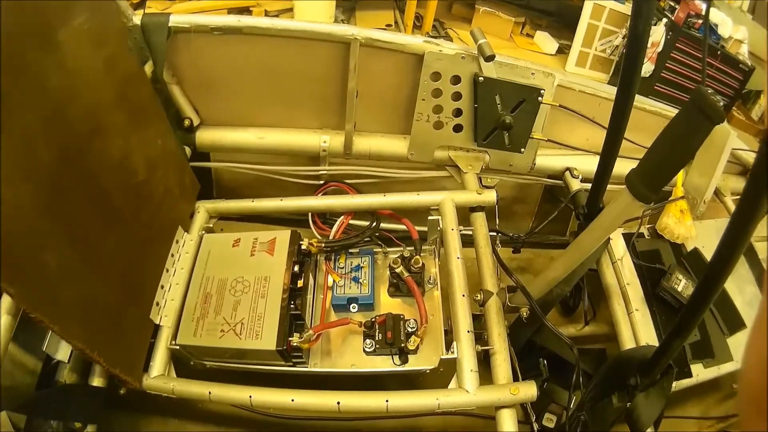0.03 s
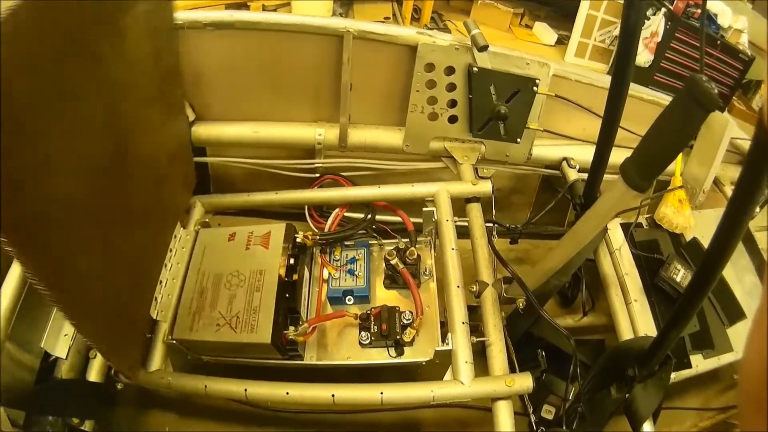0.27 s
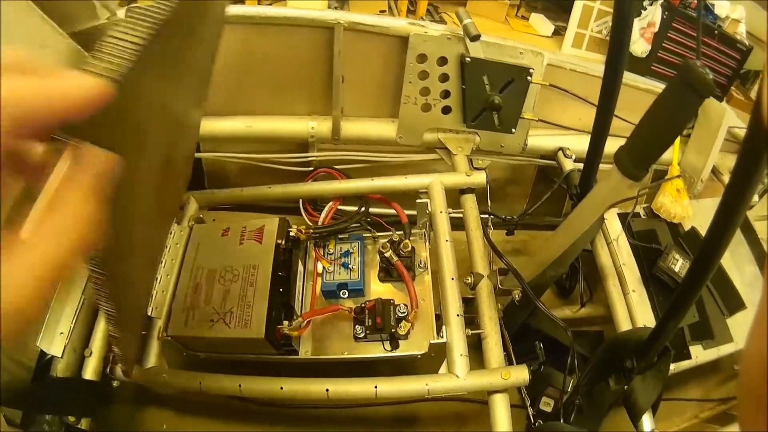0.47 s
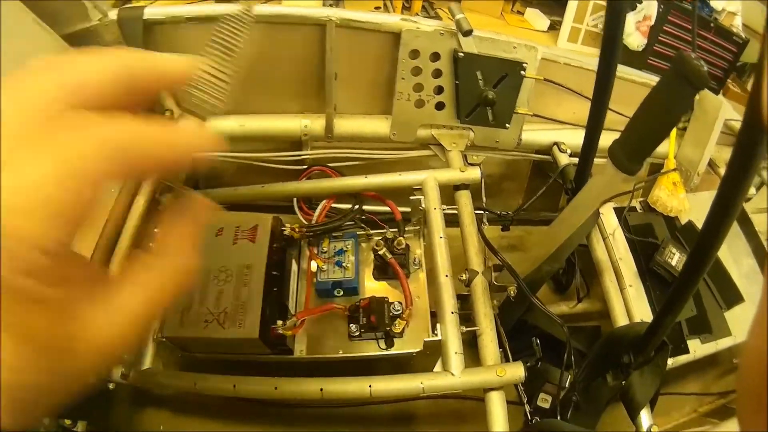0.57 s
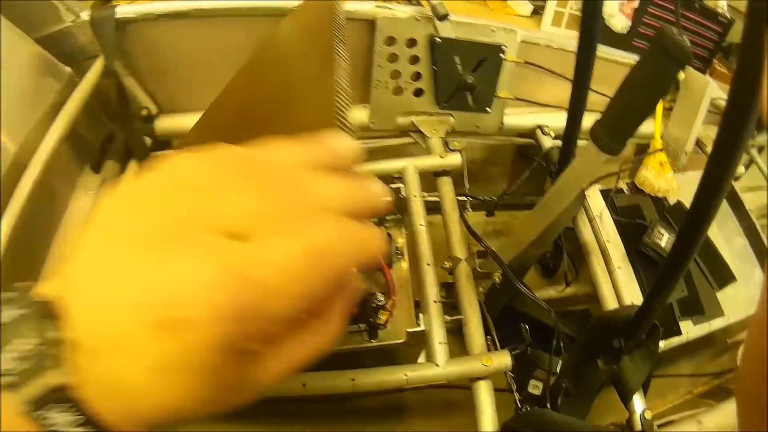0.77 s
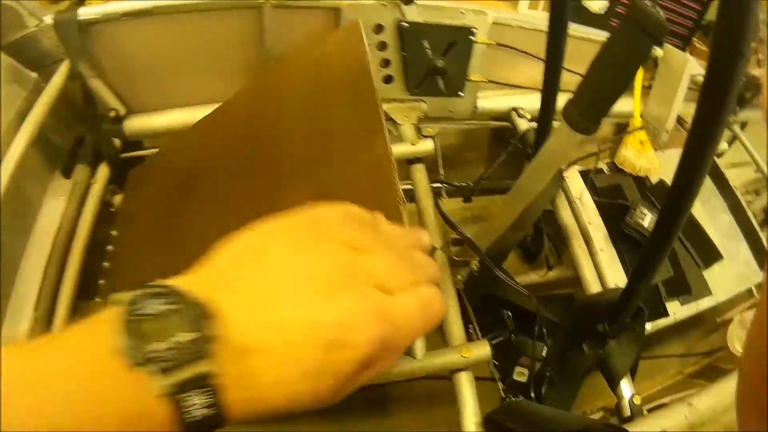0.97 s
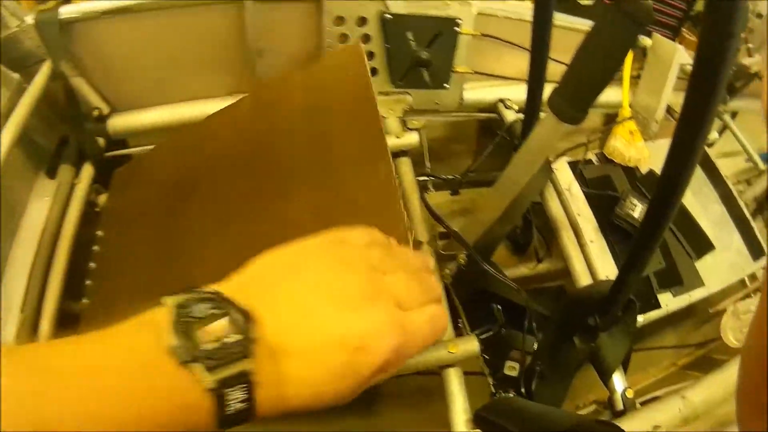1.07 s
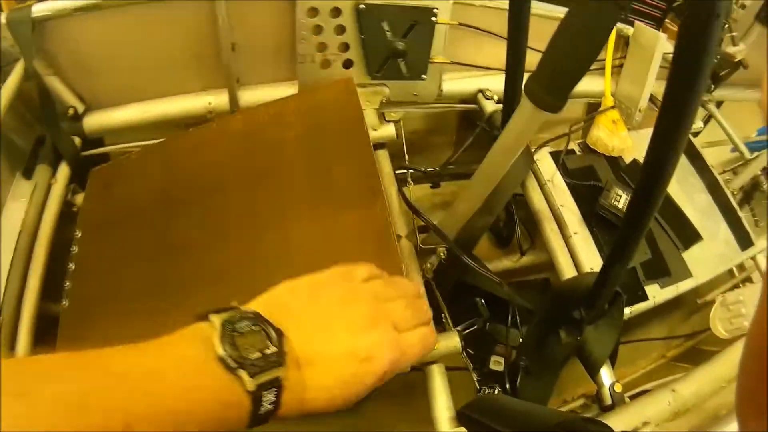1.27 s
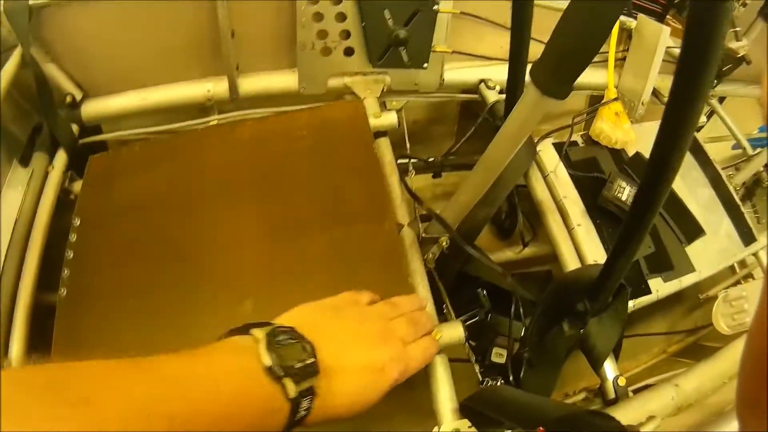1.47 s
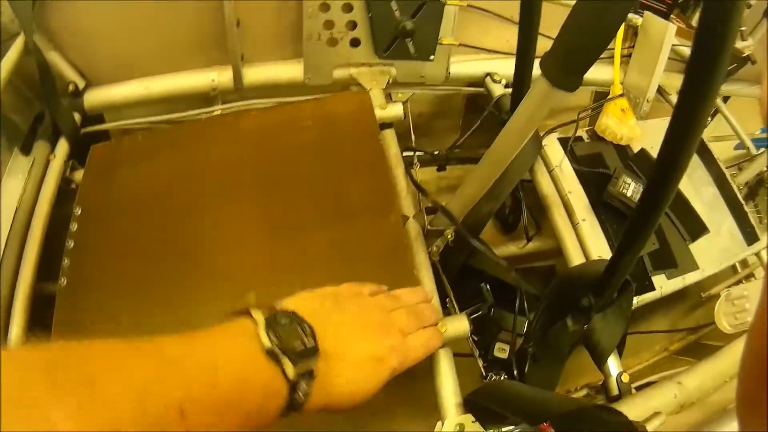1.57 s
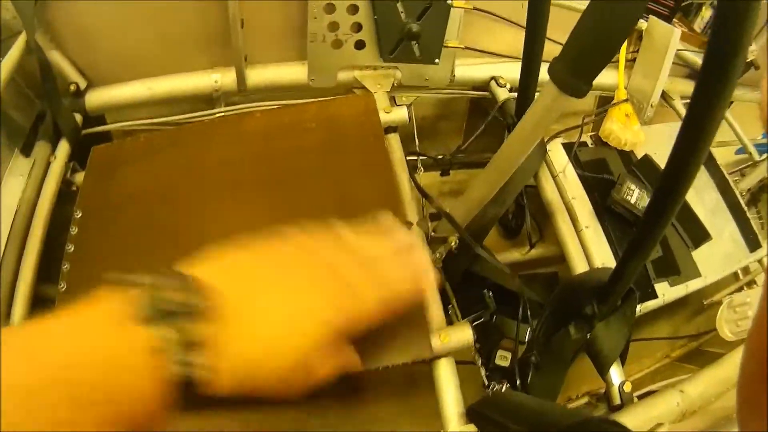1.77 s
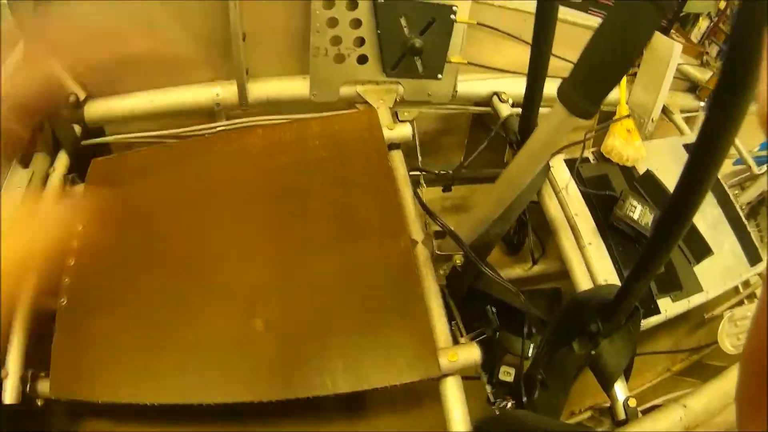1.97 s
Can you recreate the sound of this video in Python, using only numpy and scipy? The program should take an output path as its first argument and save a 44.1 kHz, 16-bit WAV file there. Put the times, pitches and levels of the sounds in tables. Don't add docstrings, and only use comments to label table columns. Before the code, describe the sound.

One loud woody clack as a hinged plate lands on metal tubes in an echoing workshop

```python
import sys
import numpy as np
from scipy import signal
from scipy.fft import rfft, irfft, next_fast_len
from scipy.io import wavfile
from scipy.ndimage import map_coordinates

SR = 44100
rng = np.random.default_rng(int(sys.argv[2]) if len(sys.argv) > 2 else 0)


def int16_out(signal):
    q = np.round(np.clip(np.atleast_2d(signal).T, -1, 1) * 32767)
    wavfile.write(sys.argv[1], SR, q.astype(np.int16))


def linear_from_db(decibels):
    return 10 ** (np.asarray(decibels, float) / 20)


N = 89434

# (time [s], peak [dB])
CONTACT_TIMES = [
    (1.4987, -15.5),
    (1.5012, -9.5),
    (1.5043, -32),
    (1.5110, -16),
    (1.5255, -23),
]
# (frequency [Hz], level [dB])
KNOCK_TONES = [(55, -12.5), (88, -13), (170, -10.5), (265, -1.5), (305, -4.5), (372, -6), (600, -4.5),
               (860, -12), (1090, -4), (1370, 4.5), (1550, -11), (2020, -4), (2500, -4), (2900, -6)]
KNOCK_TONE_DECAYS = [.1, .09, .05, .06, .12, .1, .08, .05, .08, .05, .05, .04, .04, .05]
# (frequency [Hz], level [dB], 60 dB decay [s])
TUBE_TONES = [(544, -33.5, 0.55), (575, -31, 0.55), (591, -22.5, 0.36), (676, -36, 0.64),
              (1091, -36.5, 0.61), (1420, -38.5, 0.58), (1448, -35.5, 0.65), (1817, -36, 0.59)]
# (frequency [Hz], level [dB per Hz])
CRACK_COLOUR = [(40, -29), (100, -6), (550, -4), (880, -3), (1500, -3.5), (3000, -14.5), (6500, -30),
                (12500, -39.5), (15800, -53)]
# (frequency [Hz], 60 dB decay [s])
ROOM_DECAY = [(60, 0.73), (300, 0.62), (1500, 0.95), (4000, 0.98), (9000, 0.83)]
# (frequency [Hz], level [dB])
ROOM_TONE = [(40, 8.5), (200, -2.5), (600, -2.5), (900, -0.5), (1500, 0.5), (2400, -1), (3200, -5.5),
             (5000, -2), (7000, -11)]
# (time [s], peak [dB])
HINGE_SLIPS = [(0.2057, -59), (0.2447, -55.5), (0.2855, -57), (0.3267, -55), (0.3617, -56), (0.4141, -54.5)]
# (frequency [Hz], level [dB], 60 dB decay [s])
HINGE_TONES = [(1070, -7, .11), (1400, -6, .14), (1900, -12, .02), (2400, -11, .02), (2900, -9, .025),
               (3400, -12, .02)]
# (time [s], peak [dB])
HINGE_CREAKS = [(.556, -69), (.719, -65), (.80, -67), (.854, -66), (.905, -65), (.93, -67), (.985, -68),
                (1.127, -65)]
# (frequency [Hz], level [dB])
CREAK_COLOUR = [(500, -42), (1300, -1), (2700, -4.5), (3800, -8), (5500, -20)]
# (time [s], level [dB])
RUB_LEVEL = [(0, -84), (.08, -99), (.5, -81), (.58, -77.5), (.72, -75.5), (.8, -84), (1.05, -79),
             (1.14, -66.5), (1.27, -72.5), (1.41, -79.5), (1.45, -84), (1.9, -61.5), (1.96, -61.5),
             (2.005, -57.5), (2.03, -76)]
# (frequency [Hz], width [Hz], level [dB])
RUB_RESONANCES = [(1303, 40, 4.5), (1641, 320, 5), (2600, 250, -6), (4210, 360, -12.5)]
# (time [s], length [s], level [dB])
FINGER_BRUSHES = [(1.565, .0015, -55), (1.6, .04, -70), (1.648, .005, -68), (1.668, .004, -76),
                  (1.683, 0.02, -65), (1.815, 0.13, -75.5)]
# (frequency [Hz], level [dB])
SKIN_COLOUR = [(4000, -45), (7500, 3), (9000, -2), (11000, 1.5), (13000, -3), (15500, -11)]
# (start [s], rise [s], hold [s], fall [s], level [dB])
CRICKET_TRILLS = [(0.158, 0.12, 0.061, 0.32, -72.5), (1.203, 0.094, 0.09, .25, -72)]
# (frequency [Hz], width [Hz], level [dB])
WING_RESONANCES = [(4880, 80, -5), (4980, 80, -3), (5115, 80, 0), (5240, 80, -4)]
# (frequency [Hz], level [dB per Hz])
AIR_COLOUR = [(20, 3), (40, -7), (150, -7.5), (330, -12), (520, -15), (900, -19), (2500, -25),
              (5000, -29.5), (15800, -31.5)]
# (frequency [Hz], level [dB], width [Hz])
LAMP_LINES = [(360.7, -73, 12), (482, -84, 14), (9530, -83, 70), (14150, -93, 90)]
# (time [s], gain [dB])
GAIN_MOVES = [(1.495, 2.5), (1.51, -6.5), (1.556, -6), (1.62, -1), (1.7, 6.5), (1.78, 6.5), (1.9, 8.5),
              (1.96, 4), (2.03, 8)]


def knock():
    main_s, main_db = CONTACT_TIMES[1]
    tones = np.column_stack([KNOCK_TONES, KNOCK_TONE_DECAYS])
    ring = linear_from_db(-11.5) * struck(CONTACT_TIMES, tones, scatter_db=2, beat_hz=18)
    tubes = struck([(main_s, 0)], TUBE_TONES, scatter_db=0, beat_hz=4.9)
    ring = ring + tubes * linear_from_db(1.43 * wobble(25.18))
    crack = linear_from_db(-4.5) * bursts(CONTACT_TIMES, t60=0.058) * hiss(CRACK_COLOUR)

    impulse = linear_from_db(main_db + 30) * (np.arange(N) == round((main_s + .004) * SR))
    blow = filtered(impulse, lambda hz: linear_from_db(along(CRACK_COLOUR, hz)))
    blow = blow * (np.arange(N) > main_s * SR)
    to_room = linear_from_db(-9) * ring + blow
    return ring + crack, to_room


def room(x):
    hz, t, noise = signal.stft(rng.standard_normal(SR), SR, nperseg=256)
    decay_db = 60 * t / along(ROOM_DECAY, hz)[:, None]
    shaped = noise * linear_from_db(along(ROOM_TONE, hz)[:, None] - decay_db)
    tail = signal.istft(shaped, SR, nperseg=256)[1]
    rise_s = 0.0057
    tail = tail * (1 - np.exp(-(np.arange(len(tail)) / SR / rise_s) ** 2))
    return signal.fftconvolve(x, tail / np.linalg.norm(tail))[:N]


def hinge():
    slips = linear_from_db(-6) * struck(HINGE_SLIPS, HINGE_TONES, scatter_db=2, beat_hz=31)
    creak_t60 = 0.04
    jerks = bursts(HINGE_CREAKS, creak_t60) + linear_from_db(-12) * bursts(HINGE_SLIPS, creak_t60)
    creaks = jerks * hiss(CREAK_COLOUR)
    grains = rng.standard_normal(N) * linear_from_db(1.8 * wobble(59.9))
    rub = linear_from_db(curve(RUB_LEVEL)) * unit(filtered(grains, peaks(RUB_RESONANCES)))
    return slips + creaks + rub


def fingers():
    t = np.arange(N) / SR
    strokes = sum(linear_from_db(db) * np.exp(-((t - s) / length) ** 2) for s, length, db in FINGER_BRUSHES)
    return hiss(SKIN_COLOUR) * strokes


def cricket():
    tooth_hz, jitter = 177, .4
    slack_hz = 168
    count = int(tooth_hz * N / SR) - 2
    times = (np.arange(count) + 1 + jitter * (2 * rng.random(count) - 1)) / tooth_hz
    clicks = np.bincount((times * SR).astype(int), minlength=N) * 1.

    shape, slack = np.zeros(N), np.zeros(N)
    for s, rise, hold, fall, db in CRICKET_TRILLS:
        full = s + rise
        fading = full + hold
        swell = [(s, 0), (full, 1), (fading, 1), (fading + fall / 2, .35), (fading + fall, 0)]
        shape += linear_from_db(db) * curve(swell)
        slack += curve([(s - .01, 0), (s, 1), (s + rise / 2, 1), (full, 0)])

    lowered = [(hz - slack_hz, width, db) for hz, width, db in WING_RESONANCES]
    low = unit(filtered(clicks, peaks(lowered)))
    high = unit(filtered(clicks, peaks(WING_RESONANCES)))
    trill = np.sqrt(slack) * low + np.sqrt(1 - slack) * high
    return trill * shape * linear_from_db(3 * wobble(42.5))


def background():
    t = np.arange(N) / SR
    out = linear_from_db(-66.5) * hiss(AIR_COLOUR)
    for hz, db, width in LAMP_LINES:
        fuzz = unit(filtered(rng.standard_normal(N), lambda f: np.exp(-((f - hz) / width) ** 2)))
        steady = np.sin(2 * np.pi * hz * t) * (width < 20)
        out = out + linear_from_db(db) * (steady + .5 * fuzz)
    return out


def struck(events, modes, scatter_db, beat_hz=0):
    out, t = np.zeros(N + SR), np.arange(SR // 2) / SR
    hz, level, t60 = np.transpose(modes)[:, :, None]
    attack = 1 - np.exp(-t / .0005)
    for s, db in events:
        scatter, detune, phase = rng.standard_normal((3, len(modes), 1))
        pair = np.sin(2 * np.pi * (hz * t + phase))
        pair = pair + .5 * np.sin(2 * np.pi * ((hz + beat_hz * detune) * t + phase))
        fade = linear_from_db(db + level + scatter_db * scatter - 60 * t / t60)
        out[round(s * SR):][:len(t)] += attack * (pair * fade).sum(0)
    return out[:N]


def bursts(events, t60):
    t = np.arange(N) / SR
    out = np.zeros(N)
    for s, db in events:
        edge = np.clip((t - s) / .0006, 0, 1) ** 2
        out += edge * linear_from_db(db - 60 * np.abs(t - s) / t60)
    return out


def peaks(table):
    return lambda f: sum(linear_from_db(db) * (f * w) ** 2 / (c * c - f * f + 1j * f * w) ** 2 for c, w, db in table)


def hiss(points):
    return unit(filtered(rng.standard_normal(N), lambda hz: linear_from_db(along(points, hz))))


def filtered(x, response):
    m = next_fast_len(N + 8192)
    return irfft(rfft(x, m) * response(np.fft.rfftfreq(m, 1 / SR)), m)[:N]


def wobble(rate):
    knots = rng.standard_normal(int(N * rate / SR) + 4)
    return map_coordinates(knots, [np.arange(N) * rate / SR])


def curve(rows):
    return np.interp(np.arange(N) / SR, *np.transpose(rows))


def along(points, hz):
    f, v = np.transpose(points)
    return np.interp(np.log(hz + 1), np.log(f + 1), v)


def unit(x):
    return x / np.sqrt(np.mean(x ** 2) + 1e-20)


def scene():
    direct, to_room = knock()
    knocking = direct + linear_from_db(-7) * room(to_room)
    return (knocking + hinge() + fingers() + cricket() + background())[None]


def low_pass(x):
    return signal.sosfilt(signal.butter(12, 16250, fs=SR, output="sos"), x)


def record(dry):
    x = dry[0] * linear_from_db(curve(GAIN_MOVES))
    ceiling, knee = .56, 4
    x = x / (1 + np.abs(x / ceiling) ** knee) ** (1 / knee)
    treble_cut = lambda hz: np.clip((15800 - hz) / 900, 0, 1) ** .5
    bass_cut = lambda hz: 1j * hz / (1j * hz + 20)
    x = filtered(x, lambda hz: treble_cut(hz) * bass_cut(hz))
    return low_pass(x[None])


dry = scene()
out = record(dry)
int16_out(out)
```